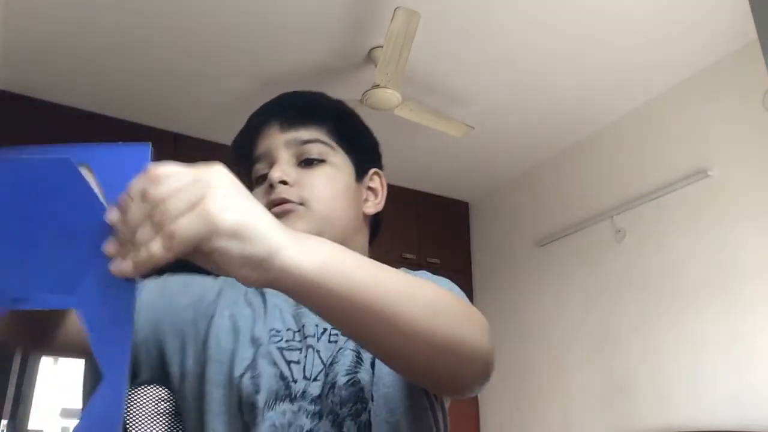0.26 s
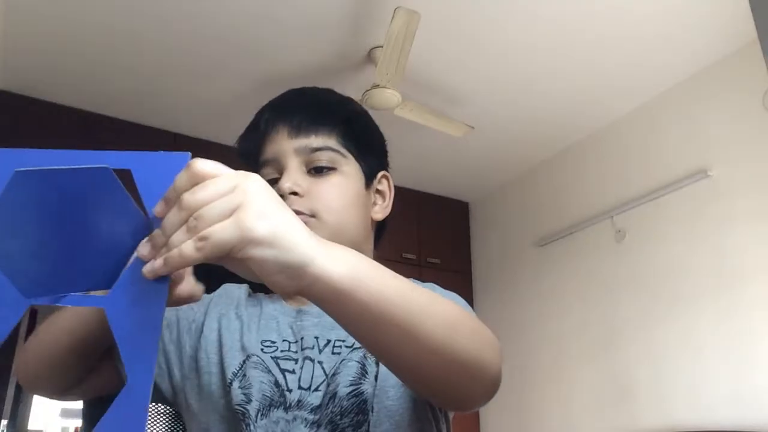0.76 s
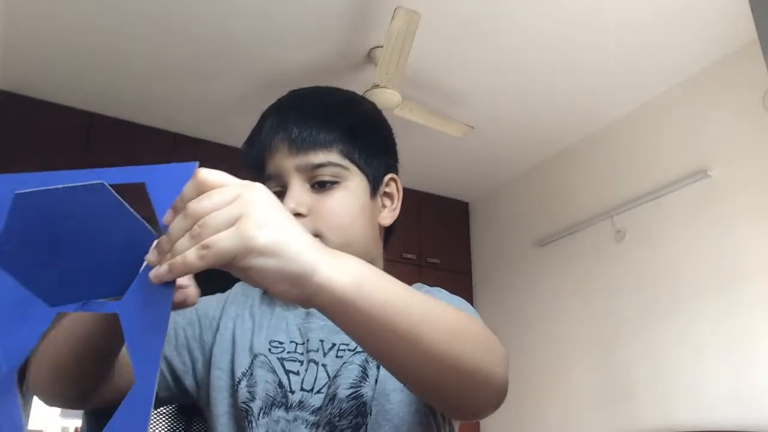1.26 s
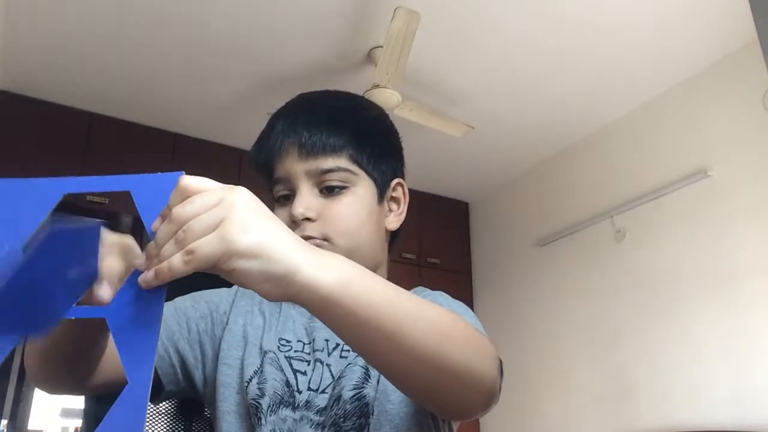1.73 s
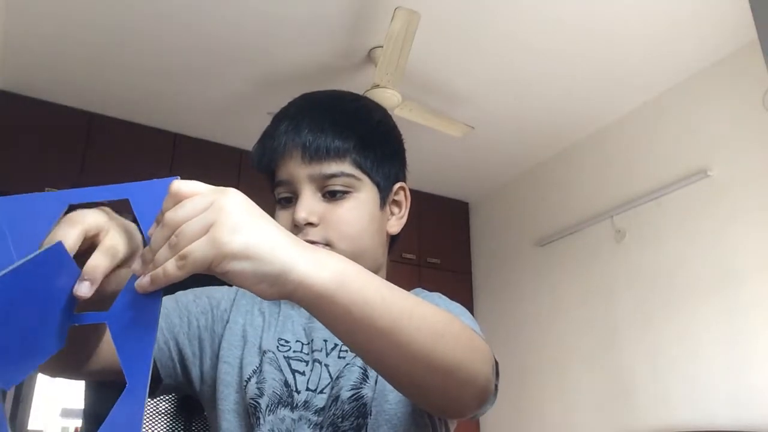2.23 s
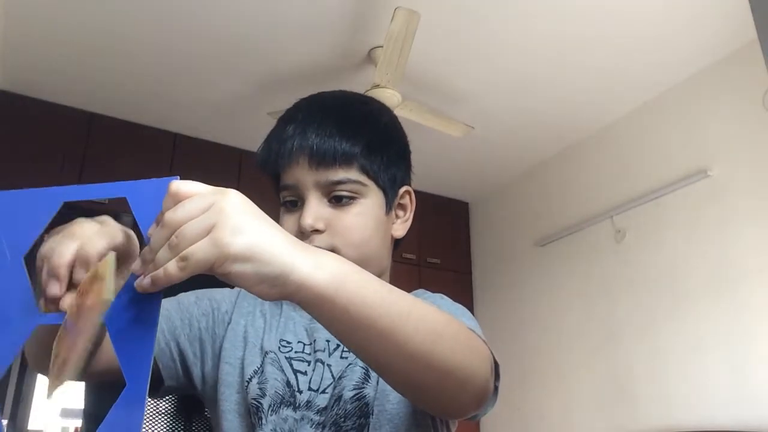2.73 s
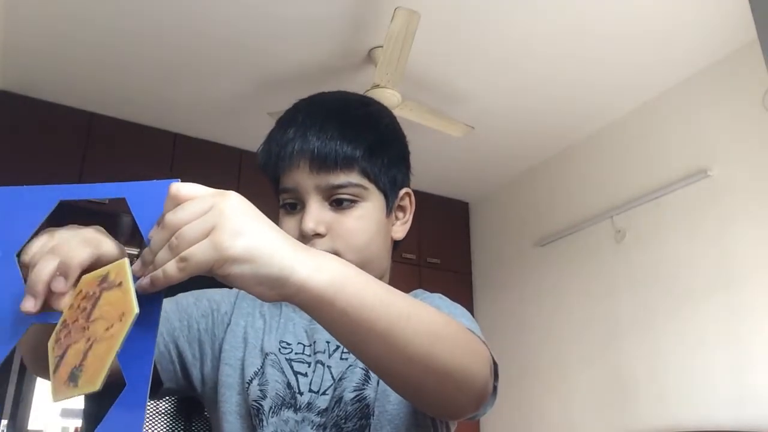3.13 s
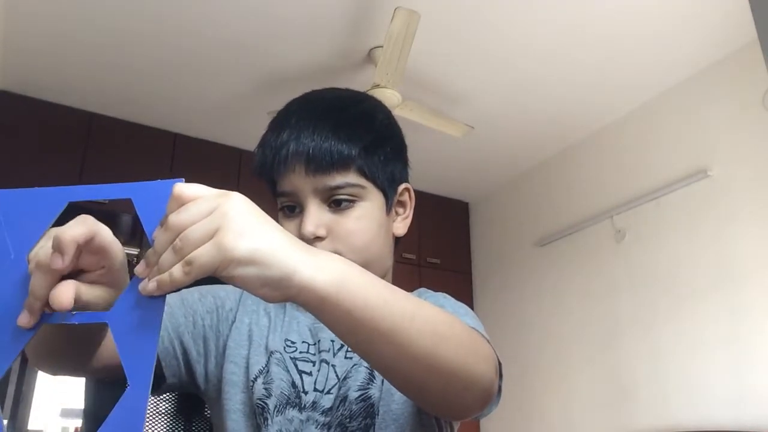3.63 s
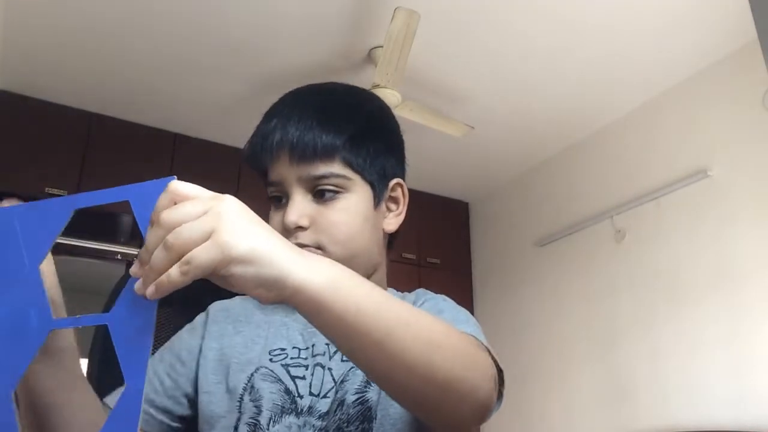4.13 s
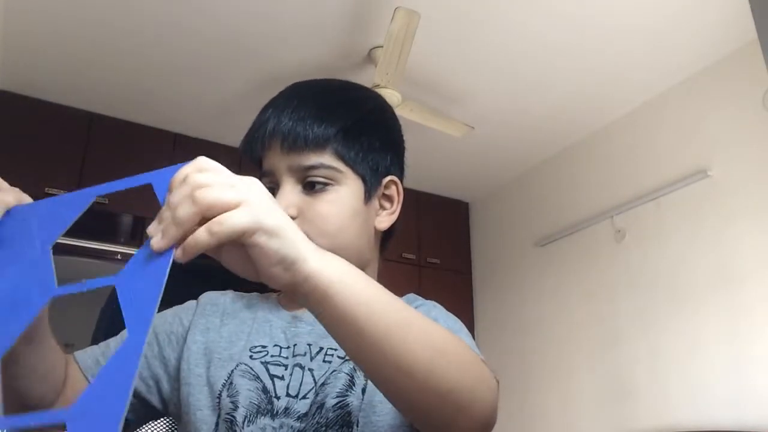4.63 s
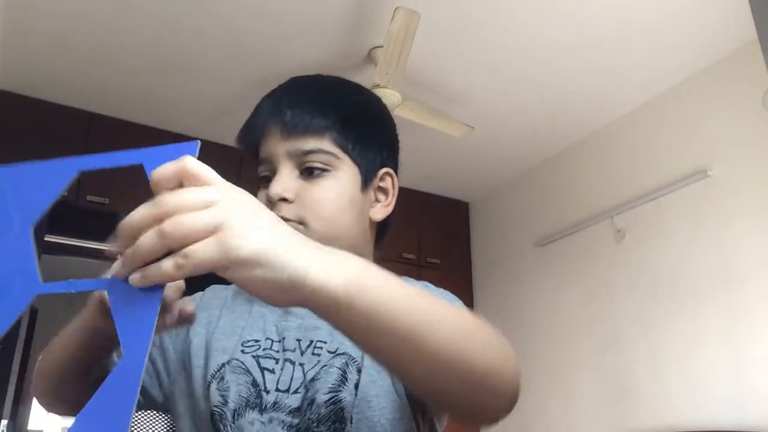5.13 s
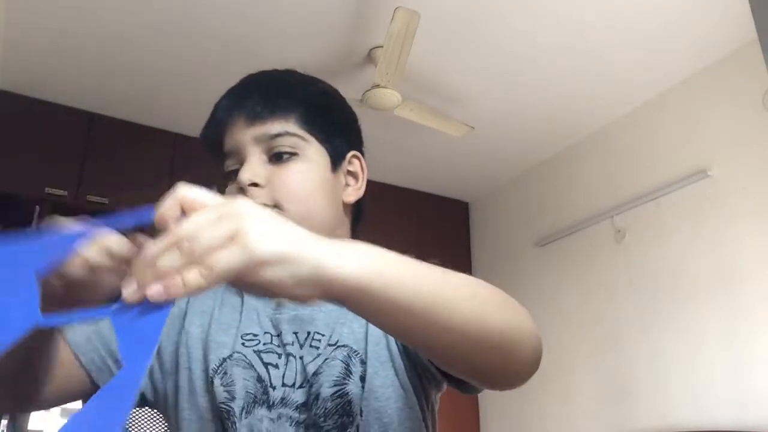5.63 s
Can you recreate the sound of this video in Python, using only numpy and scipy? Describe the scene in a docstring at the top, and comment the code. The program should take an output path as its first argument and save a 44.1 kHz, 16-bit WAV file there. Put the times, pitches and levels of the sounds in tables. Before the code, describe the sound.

Close by, a cardboard punchboard cracks sharply with a hollow thunk as its tabs tear, then creaks briefly and snaps again. Faint taps and finger bumps follow. Midway, a quick cluster of snaps and clatter comes as the tile breaks free. After more soft bumps and rubs, a few further snaps sound near the end. The small room adds slight reverberation and a faint low hum.

```python
"""Sharp cracks of tearing paper, close by, as a child presses a tile out of a cardboard punchboard.
Each tab fails in a run of fibre fractures, and the released sheet rings in its damped bending modes.
Card taps on card, fingers bump the sheet, and stick-slip friction makes it drone, hiss and groan.
A small bare room reverberates; behind lie a low hum, soft noise, thin whistles and a far street horn."""
import sys
import numpy as np
from scipy import signal
from scipy.fft import rfft, irfft, next_fast_len
from scipy.io import wavfile
from scipy.ndimage import map_coordinates

SR = 44100
rng = np.random.default_rng(int(sys.argv[2]) if len(sys.argv) > 2 else 0)


def file_out(sig):
    """Save sig as 16-bit WAV at sys.argv[1]."""
    # one column per channel
    cols = np.atleast_2d(sig).T
    # limit, then scale
    lim = np.clip(cols, -1, 1)
    pcm = np.round(lim * 32767).astype(np.int16)
    wavfile.write(sys.argv[1], SR, pcm)


N = 258867
TIME = np.arange(N) / SR
RING = np.arange(int(SR * .36)) / SR  # time axis of one blow, in seconds

# The sheet's hollow middle modes. Each row: nominal frequency in Hz, relative level in dB, t60 in seconds.
KNOCK_MODES = [(228.5, -3, 0.051), (326.2, 1, 0.037), (405, -2.5, 0.043), (520, -7, 0.048),
               (613, -2.5, 0.033)]
# Its higher, shorter modes. Each row: nominal frequency in Hz, relative level in dB, t60 in seconds.
CLACK_MODES = [(840, 2.5, 0.019), (1108, -3.5, 0.037), (1270, 1.5, 0.023), (1510, -13.5, 0.029)]
# The spectrum of breaking fibres. Each row: frequency in Hz, relative spectral density in dB.
CRACK_SPECTRUM = [(600, -37), (1500, 5.5), (2300, 6.5), (3900, -3.5), (5200, -13), (7000, -20.5),
                  (12000, -36)]


def snaps():
    """Release of elastic energy: each paper tab tears and lets the bent sheet spring back."""
    # Tearing tabs and caught edges. Each row: start in seconds, strength in dB, sharpness in dB,
    # bend relative to strength in dB, time scale of the tear in seconds.
    tears = [(0.386, -28.5, -9, 1, 0.0038), (0.394, -33, -0.3, 4.5, .005), (0.507, -43, -5, -15, 0.0033),
             (1.097, -43, -6.5, 4.5, 0.0051), (1.56, -54.5, -2, 17, 0.0074), (3.441, -46, 2.5, 1.5, 0.0018),
             (3.48, -42.5, -6, 10.5, 0.0032), (3.7793, -39, 2.5, 5, 0.022), (3.988, -60, -4, 20, 0.0084),
             (4.222, -55.5, -3, -23, 0.0024), (5.6003, -29.5, -6, -8, 0.0031),
             (5.698, -38, -3.5, 3.5, 0.0047), (5.84, -46, 0.5, -0.5, 0.0065)]
    track = np.zeros(N)
    for s, strength_db, sharp_db, bend_db, tear_s in tears:
        flex_db = strength_db + bend_db
        add(track, s, card_blow(strength_db, sharp_db, flex_db, fizz_db=-10, tear_s=tear_s, pitch=1.141))
    return track


def taps():
    """Impact excitation: card strikes card with little fizz; strong, blunt taps bend the sheet most."""
    # Edge ticks and the clattering tile. Each row: start in seconds, strength in dB, sharpness in dB.
    impacts = [(0.436, -39, -4.5), (0.823, -66, -4), (0.886, -66.5, -2.5), (1.11, -44.5, -5.5),
               (1.585, -52.5, -5.5), (2.077, -63.5, -17), (2.299, -66.5, -12), (2.503, -69, -2.5),
               (2.809, -68, -7.5), (2.892, -62, -2.5), (3.5495, -30, -7.5), (3.655, -30.5, 1.5),
               (3.668, -36.5, -3.5), (3.712, -38, 2.5), (3.744, -55.5, -4.5), (3.796, -43.5, -2),
               (4.33, -62.5, 3.5), (4.484, -66, -11), (4.586, -65, -1.5), (5.195, -58, -3.5),
               (5.567, -65, 3.5), (5.645, -53.5, -3)]
    track = np.zeros(N)
    for s, strength_db, sharp_db in impacts:
        flex_db = -5.5 + .8 * strength_db - .43 * sharp_db
        fizz_db = -19 + .55 * sharp_db  # a blunt tap frays fewer fibres
        add(track, s, card_blow(strength_db, sharp_db, flex_db, fizz_db, tear_s=.0063, pitch=1.365))
    return track


def card_blow(strength_db, sharp_db, flex_db, fizz_db, tear_s, pitch, contact_s=.0021):
    """Source and resonator: fractures crack and rattle the card; sharpness trades knock for crack."""
    # Stiff patches by a tab. Each row: nominal frequency in Hz, relative level in dB, t60 in seconds.
    patch_modes = [(1983, -6.5, 0.1), (2281, -1, 0.0278), (2780, 3, 0.011), (3360, -1.5, 0.024),
                   (3940, 1.5, 0.014), (4435, -1, .015), (4960, -6, 0.025)]
    # The treble of fraying fibres. Each row: frequency in Hz, relative spectral density in dB.
    fizz_spectrum = [(3000, -40), (5500, 7), (7000, 6), (10000, -4.5), (13000, -14.5), (16000, -22.5)]
    knock_db, crack_db = strength_db - sharp_db, strength_db + sharp_db
    shift = pitch * np.exp(.011 * sharp_db)  # a sharper blow bends a smaller, higher-pitched patch
    room, fractures = room_response(), fibres(tear_s)
    blow = radiated(fractures * np.exp(-RING / contact_s), room, wet_db=-3)
    clack = at_level(struck(blow, CLACK_MODES, attack_s=.0003), strength_db - .7)
    rip = radiated(fractures, room, wet_db=-2.5)
    tearing = at_level(coloured(rip, CRACK_SPECTRUM), 0)
    patches = struck(in_room(fractures, room, wet_db=-8.5), patch_modes, attack_s=.0001)
    crack = at_level(tearing + at_level(patches, -3), crack_db)
    fizz = at_level(coloured(rip, fizz_spectrum), crack_db + fizz_db)
    return thunk(flex_db, knock_db, shift, room) + clack + crack + fizz


def fibres(tear_s, spread_db=5, clump_db=2.5, rise_s=.0012):
    """Acoustic emission: paper tears in a quick, clumped run of tiny fractures of uneven size."""
    n = len(RING)
    sizes = np.repeat(amp(spread_db * rng.standard_normal(n // 20 + 1)), 20)[:n]
    clumps = amp(clump_db * np.interp(RING * 500, np.arange(400), rng.standard_normal(400)))
    progress = RING / max(tear_s, .001)
    envelope = (1 + progress) * np.exp(-1.5 * progress) * (1 - np.exp(-RING / rise_s))
    return rng.standard_normal(n) * sizes * clumps * envelope


def thunk(flex_db, knock_db, shift, room):
    """Free vibration: the card springs back with a slow whole-sheet bend and a hollow knock."""
    # Whole-sheet bending. Each row: frequency in Hz, relative level in dB, t60 in seconds.
    flex_modes = [(71, -27.5, 0.018), (100.4, -3, 0.083), (134, 0, 0.057), (177.3, -0.5, 0.053)]
    flex = in_room(ring(flex_modes, 1, attack_s=.012), room, wet_db=-10)
    knock = in_room(ring(KNOCK_MODES, shift, attack_s=.001), room, wet_db=-7.5)
    return at_level(flex, flex_db) + at_level(knock, knock_db)


def ring(modes, shift, attack_s):
    """Modal superposition: damped sines, whose pitch and strength the grip alters at every blow."""
    hz, db, t60 = np.transpose(modes)[:, :, None]
    detune, grip_db = rng.standard_normal((2, len(modes), 1)) * [[[.03]], [[1.5]]]
    t = RING[:len(RING) // 3]
    waves = amp(db + grip_db) * np.sin(2 * np.pi * hz * shift * np.exp(detune) * t) * fade(t, t60)
    onset = 1 - np.exp(-t / attack_s)
    return np.pad(waves.sum(0) * onset, (0, len(RING) - len(t)))


def struck(blow, modes, attack_s):
    """Forced response: a run of fractures is convolved with the ringing of the modes."""
    return signal.fftconvolve(blow, ring(modes, shift=.95, attack_s=attack_s))[:len(blow)]


def bumps(cutoff_hz=450):
    """Soft contact acts as a low-pass filter: finger pads move only the sheet's low modes."""
    # Finger bumps. Each row: start in seconds, bend strength in dB, knock relative to bend in dB.
    touches = [(0.45, -25, -15), (1.108, -29.5, -2.5), (1.157, -44, -1.5), (1.345, -60, 0),
               (2.139, -50.5, -7), (2.998, -51, -12), (3.151, -53, -11), (3.345, -50.5, -14.5),
               (4.022, -38, -13), (4.037, -39.5, -3), (4.235, -52.5, 11.5), (4.573, -46.5, -5),
               (4.864, -47.5, -11), (5.475, -53, -11)]
    track = np.zeros(N)
    for s, bend_db, firm_db in touches:
        add(track, s, thunk(bend_db, bend_db + firm_db, shift=.96, room=room_response()))
    return signal.sosfilt(signal.butter(3, cutoff_hz, fs=SR, output="sos"), track)


def slide(attack_s=.015, grain_db=3, snag_db=4):
    """Stick-slip friction: sliding skin makes the sheet drone and its surface hiss with tiny snags."""
    # Strokes along the card. Each row: start and length in seconds, drone level and hiss level in dB.
    strokes = [(1.124, 0.058, -51, -64.5), (3.974, .06, -56.5, -67.5), (5.138, 0.049, -67, -61.5),
               (5.303, 0.056, -40, -66), (5.394, 0.047, -56.5, -60)]
    # The rubbed sheet's resonances. Each row: frequency in Hz, bandwidth in Hz, relative gain in dB.
    resonances = [(316, 73, -5), (558, 20, -16.5), (765, 32, -23), (998, 53, -32.5), (1290, 23, -46)]
    # Skin on paper. Each row: frequency in Hz, relative spectral density in dB.
    hiss_spectrum = [(1000, -30), (2500, 7), (4000, 5.5), (7000, -1.5), (11000, -4.5), (16000, -8)]

    def sheet(f):
        """Parallel resonators, rolled off below 220 Hz and above 1300 Hz."""
        peaks = sum(amp(db) * 1j * f * width / (hz * hz - f * f + 1j * f * width)
                    for hz, width, db in resonances)
        return peaks / (1 + 1j * f / 1300) * (1j * f / (220 + 1j * f)) ** 2

    drone_gain = sum(amp(db) * held(s, length, attack_s, t60=.5) for s, length, db, _ in strokes)
    hiss_gain = sum(amp(db) * held(s, length, attack_s, t60=.13) for s, length, _, db in strokes)
    slips = rng.standard_normal(N) * amp(grain_db * wobble(300))
    snags = slips * amp(snag_db * wobble(900))
    drone = drone_gain * unit(filtered(slips, sheet))
    hiss = hiss_gain * unit(coloured(snags, hiss_spectrum))
    return in_room(drone + hiss, room_response(), wet_db=-7.5)


def groans():
    """Stick-slip oscillation: the bent sheet groans roughly under the thumb before a tab gives."""
    # Groans. Each row: centre and half length in seconds, frequency in Hz, level in dB.
    slips = [(1.068, .019, 285, -44), (1.5, .035, 275, -57)]
    direct = sum(amp(db) * swell(s, half) * tone(hz, waver=.16) for s, half, hz, db in slips)
    return in_room(direct, room_response(), wet_db=-6)


def handling(count=45, level_db=-79, spread_db=4):
    """Impulse excitation: fibres of the held sheet tick at random moments and ring its modes."""
    when, chance = rng.random((count, 2)).T
    sizes = amp(spread_db * np.minimum(-np.log(1 - chance), 2))
    ticks = np.bincount((when * (N - 1)).astype(int), sizes, N)
    body = unit(struck(ticks, KNOCK_MODES + CLACK_MODES, attack_s=.00062))
    crackle = amp(-2.5) * unit(coloured(ticks, CRACK_SPECTRUM))
    return amp(level_db) * unit(in_room(body + crackle, room_response(), wet_db=-1))


def room_response(near_db=-5, near_t60=.041, build_s=.0017):
    """Reverberation: early scatter from body and furniture, and a diffuse tail that dies band by band."""
    # The room's reverberation times. Each row: frequency in Hz, t60 in seconds.
    decay_times = [(80, 0.34), (400, 0.41), (1500, 0.2), (4000, 0.34), (12000, 0.19)]
    hz, t, bands = signal.stft(rng.standard_normal(len(RING)), SR, nperseg=256)
    bands = bands * fade(t, along(decay_times, hz)[:, None])
    tail = signal.istft(bands, SR, nperseg=256)[1][:len(RING)]
    tail *= 1 - np.exp(-RING / build_s)
    near = rng.standard_normal(len(RING)) * fade(RING, near_t60) * (RING > .002)
    return tail / np.linalg.norm(tail) + amp(near_db) * near / np.linalg.norm(near)


def in_room(x, room, wet_db):
    """Superposition of the direct sound and its reflections."""
    return x + amp(wet_db) * signal.fftconvolve(x, room)[:len(x)]


def radiated(fractures, room, wet_db):
    """Diffuse field: fractures radiate every way, so the room returns their mean spectrum."""
    return fractures / np.linalg.norm(fractures) + amp(wet_db) * room


def hum(hz=160, level_db=-65.5):
    """Random modulation of pitch and level makes the room's low hum uneven."""
    return amp(level_db + 3 * wobble(5)) * tone(hz, waver=.09)


def room_noise(start_db=-57.5, sink_db_per_s=.41):
    """Broadband ambient noise, strongest in the bass, slowly settles in level."""
    # The room's noise floor. Each row: frequency in Hz, relative spectral density in dB.
    spectrum = [(15, -58.5), (25, -23), (62, -7), (156, -4.5), (198, -7), (227, -8.5), (340, -15.5),
                (410, -15.5), (445, -14.5), (970, -26), (1080, -27.5), (1800, -32), (3090, -36),
                (9810, -43), (15500, -50)]
    noise = unit(filtered(rng.standard_normal(N), lambda hz: amp(along(spectrum, hz))))
    return noise * amp(start_db - sink_db_per_s * TIME + .5 * wobble(5.63))


def horn(level_db=-69.5, street_t60=1.5):
    """Distant transmission: only the upper partials of one toot arrive, and the street prolongs them."""
    # The horn's partials. Each row: frequency in Hz, relative level in dB.
    partials = [(2805, -10.5), (3215, -2), (3595, 2), (3994, -3), (4409, -16)]
    chord = unit(sum(amp(db) * tone(hz, waver=.016) for hz, db in partials))
    toot = held(s=1.233, length_s=.26, attack_s=.13, t60=street_t60)
    return in_room(amp(level_db) * toot * chord, room_response(), wet_db=-2)


def whistles(gain_db=-7.5, flutter_db=3):
    """Random amplitude modulation makes faint, thin whistles flutter."""
    # High tones. Each row: centre and half length in seconds, frequency in Hz, relative level in dB.
    notes = [(.69, .04, 7480, -78), (1.2, 1.1, 7480, -82.5), (1.0, 1.0, 9600, -88), (.87, .1, 3140, -78),
             (3.39, .04, 3150, -70), (3.38, .05, 2820, -74)]
    tones = sum(amp(db) * swell(s, half) * tone(hz, waver=.01) for s, half, hz, db in notes)
    flutter = unit(amp(flutter_db * wobble(16)))
    return in_room(amp(gain_db) * tones * flutter, room_response(), wet_db=-2)


def tone(hz, waver):
    """A sine of unsteady pitch and strength; waver is the relative pitch deviation."""
    phase = 2 * np.pi * np.cumsum(hz * (1 + waver * wobble(150))) / SR
    return unit(np.sin(phase) * amp(2.5 * wobble(60)))


def wobble(rate, count=8):
    """A smooth random curve, rate knots a second."""
    knots = rng.standard_normal(int(N * rate / SR) + 4)
    steps = np.arange((len(knots) - 1) * count) / count
    return np.interp(TIME * rate, steps, map_coordinates(knots, [steps]))


def held(s, length_s, attack_s, t60):
    """Attack, hold and release of a sound that starts at time s."""
    return np.clip((TIME - s) / attack_s, 0, 1) * fade(np.maximum(TIME - s - length_s, 0), t60)


def swell(s, half):
    """A flat-topped swell around time s."""
    return np.exp(-((TIME - s) / half) ** 4)


def fade(t, t60):
    """Exponential decay by 60 dB in t60."""
    return np.exp(-np.log(1000) * t / t60)


def along(points, hz):
    """Interpolation of (Hz, value) points on a logarithmic frequency axis."""
    f, values = np.transpose(points)
    return np.interp(np.log(hz + 1), np.log(f + 1), values)


def filtered(x, response):
    """Linear filtering: the spectrum of x times a frequency response."""
    size = next_fast_len(len(x) + SR // 4)
    return irfft(rfft(x, size) * response(np.fft.rfftfreq(size, 1 / SR)), size)[:len(x)]


def coloured(x, spectrum, size=2048):
    """Minimum-phase filtering with the gain of the (Hz, dB) points."""
    gain = amp(along(spectrum, np.fft.rfftfreq(size, 1 / SR)))
    cepstrum = irfft(np.log(gain))
    cepstrum[1:size // 2] *= 2
    cepstrum[size // 2 + 1:] = 0
    return signal.fftconvolve(x, irfft(np.exp(rfft(cepstrum))))[:len(x)]


def amp(db):
    """Decibels as an amplitude ratio."""
    return 10 ** (np.asarray(db) / 20)


def unit(x):
    """Scale to an rms of 1."""
    return x / np.sqrt(np.mean(x ** 2) + 1e-20)


def at_level(x, db):
    """Scale a hit so that its first 30 ms have this rms level."""
    head = x[:int(.03 * SR)]
    return x * amp(db) / np.sqrt(np.mean(head ** 2) + 1e-20)


def add(track, s, sound):
    """Mix a sound into the track at time s."""
    start = round(s * SR)
    track[start:start + len(sound)] += sound[:N - start]


def scene():
    """Superposition: tile, sheet and hands sound in front of the quiet room, in one channel."""
    cardboard = snaps() + taps() + bumps() + slide() + groans() + handling()
    return (cardboard + hum() + room_noise() + horn() + whistles())[None]


def record(dry, low_hz=45, top_hz=15800):
    """Band limiting: the phone's microphone loses the deep bass and the highest treble."""
    thinned = signal.sosfilt(signal.butter(3, low_hz, "highpass", fs=SR, output="sos"), dry)
    return np.array([filtered(channel, lambda hz: hz < top_hz) for channel in thinned])


dry = scene()
out = record(dry)
file_out(out)
```